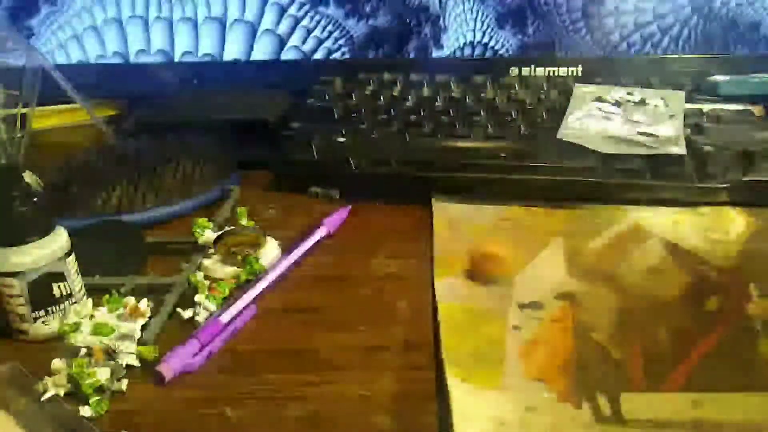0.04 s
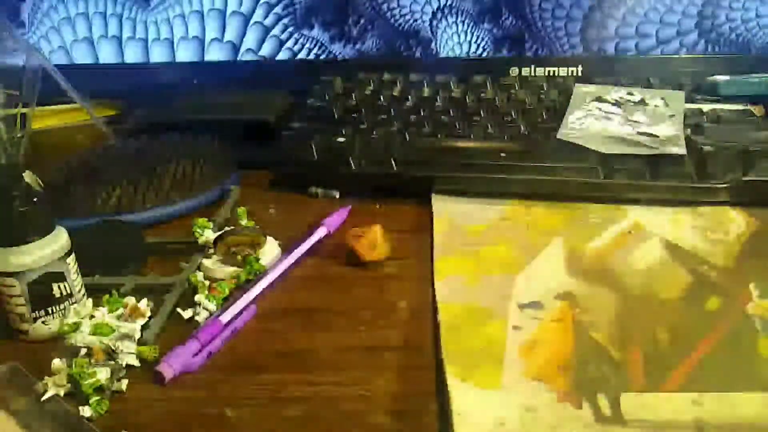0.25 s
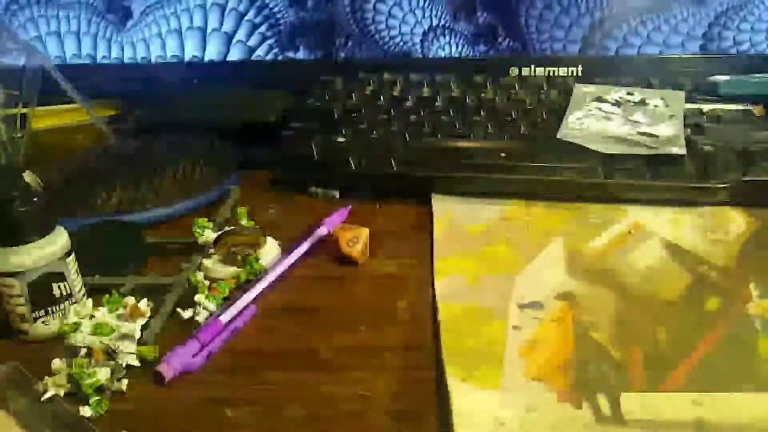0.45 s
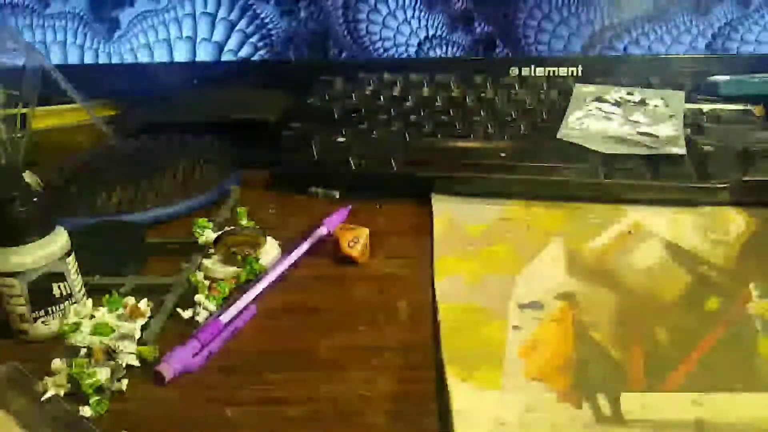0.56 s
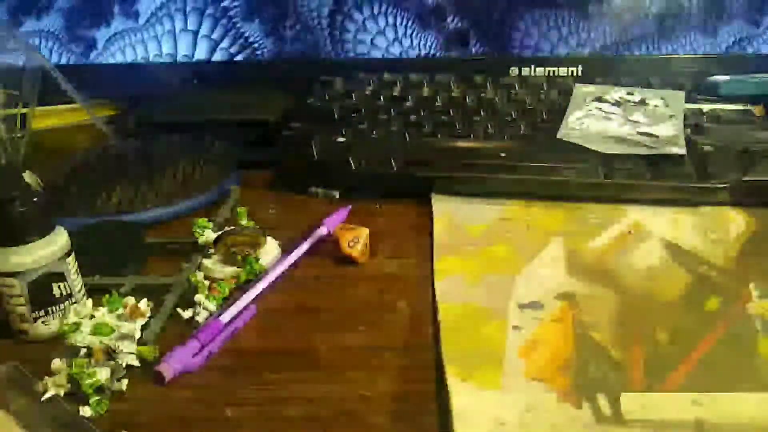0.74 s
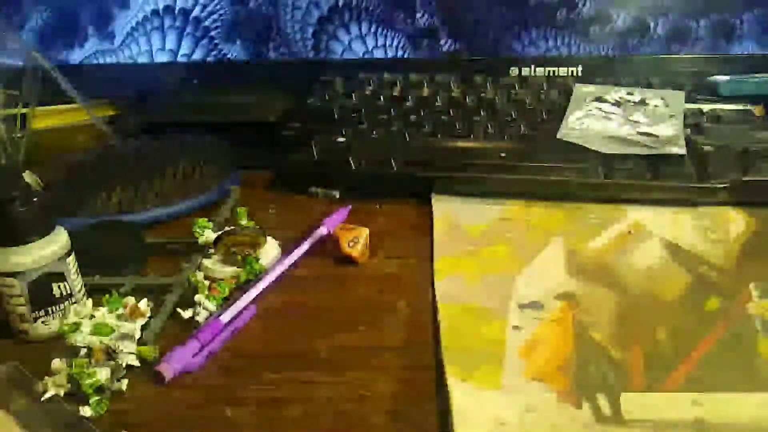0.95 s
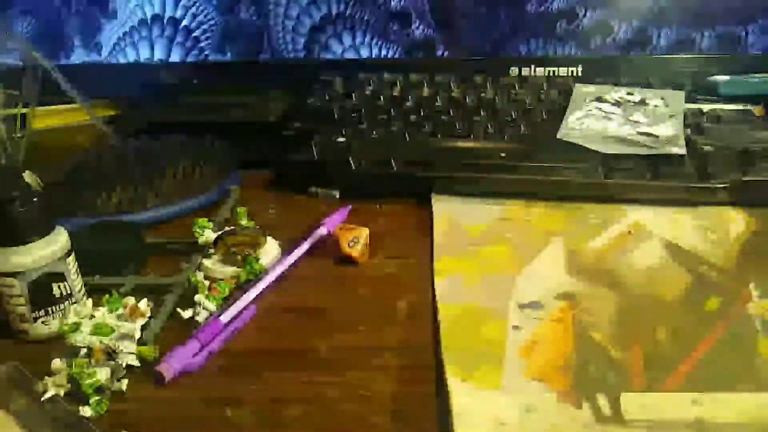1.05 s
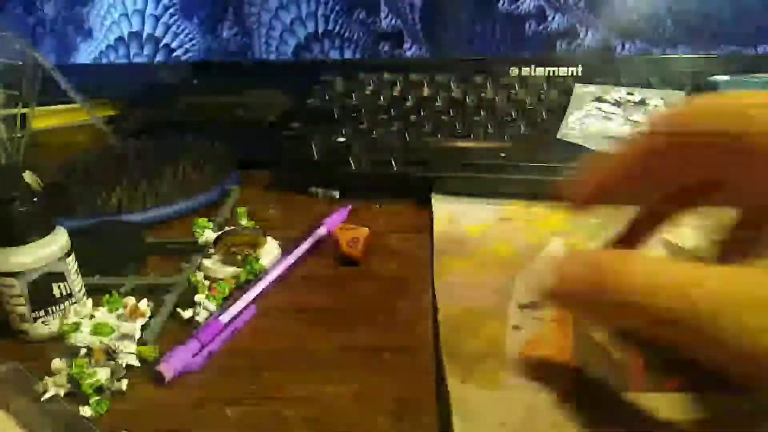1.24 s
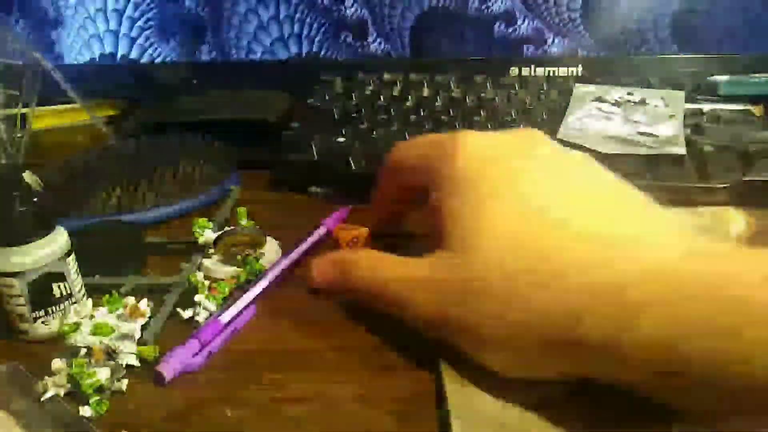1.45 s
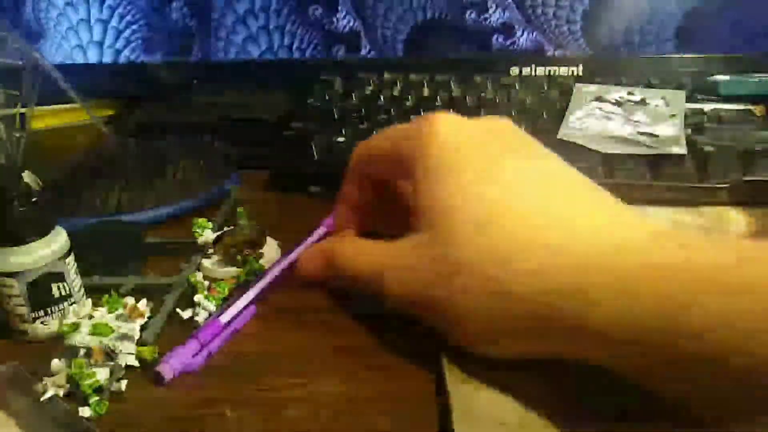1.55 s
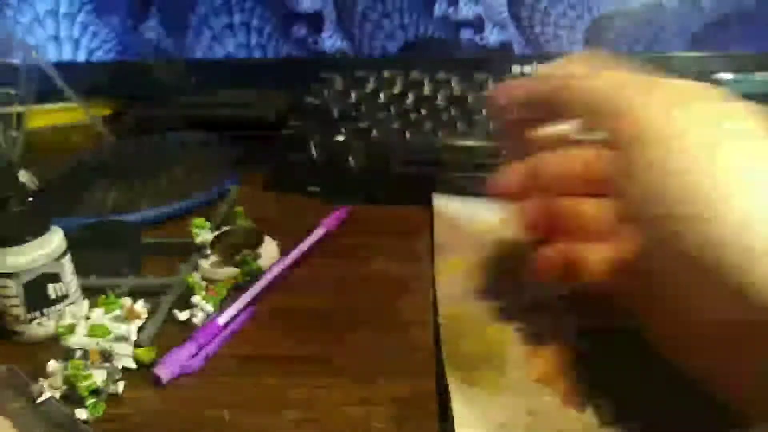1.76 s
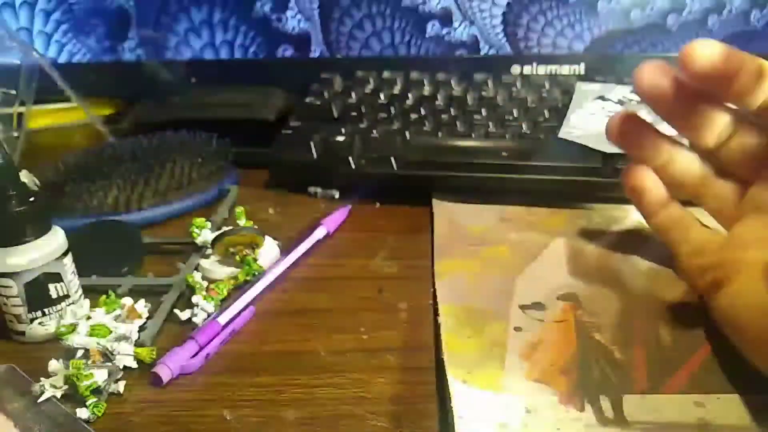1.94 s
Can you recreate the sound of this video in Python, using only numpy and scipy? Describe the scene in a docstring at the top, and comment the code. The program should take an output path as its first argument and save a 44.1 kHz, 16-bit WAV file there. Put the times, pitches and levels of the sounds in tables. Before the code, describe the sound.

A small plastic die drops on a wooden desk, bounces with sharp clicks and quickly settles. A hand then softly bumps the desk and picks the die up with a light tick. Heard close in a small room with a faint fan.

```python
"""A wooden desk in a small room, heard from close by through two microphone ports. A fan runs throughout.
At 0.2 s a plastic die drops, bounces a few times unevenly, then clatters faster and fainter to rest.
Each contact cracks, rings the desk top and scatters off the clutter into the room.
From 1.1 s a hand reaches in, bumps the desk and touches the die,
then picks it up at 1.7 s with a light scrape and a tick."""
import sys
import numpy as np
from scipy import signal
from scipy.fft import rfft, irfft
from scipy.io import wavfile

SR = 44100
rng = np.random.default_rng(int(sys.argv[2]) if len(sys.argv) > 2 else 0)


def store_wav(level_fs):
    """Save 16-bit WAV to argv[1]."""
    pcm = np.round(np.clip(np.atleast_2d(level_fs), -1, 1) * 32767)
    wavfile.write(sys.argv[1], SR, pcm.T.astype(np.int16))


N = 88200
T = np.arange(N) / SR
HZ = np.fft.rfftfreq(N, 1 / SR)

# rush of the fan (frequency [Hz], relative level [dB])
FAN_COLOUR = [(15, -75), (25, -40), (70, -5.5), (87, -8.5), (108, -2), (170, -5.5), (212, -3), (256, -4.5),
              (277, -12.5), (344, -9.5), (405, -18.5), (476, -9.5), (560, -13), (607, -10), (818, -14),
              (911, -12), (1330, -24), (1700, -24.5), (2160, -36), (2990, -30.5), (4490, -42.5),
              (14800, -47), (16000, -56)]
# hum of the fan (frequency [Hz], level [dB])
FAN_HUM = [(120, -71.5), (216, -72)]
# room tail (frequency [Hz], relative level [dB], t60 [s])
ROOM_TAIL = [(100, -13.5, 0.25), (402, -8.5, 0.27), (579.6, 2.5, 0.2), (760, -2, 0.29), (990, -1, 0.16),
             (1310, -6.5, 0.3), (1640, 3.5, .21), (2050, -7, 0.16), (2450, 2, 0.15), (3060, 0, 0.17),
             (3870, 0.5, 0.12), (4950, -5, 0.14), (8550, -6.5, 0.13), (12400, -9, 0.19), (16100, -4, .13)]
# the hand brushing past (time [s], half length [s], level [dB])
BRUSHES = [(1.158, 0.018, -73), (1.393, 0.028, -71), (1.51, 0.065, -75), (1.606, 0.048, -84),
           (1.71, 0.0088, -66.5), (1.74, .016, -72), (1.955, 0.037, -74.5)]
# fingers touching and lifting the die (time [s], level [dB])
TOUCHES = [(1.3295, -57.5), (1.3493, -55.5), (1.382, -62.5), (1.6971, -48.5)]
# low knocks of the hand on the desk (time [s], level [dB])
HAND_BUMPS = [(1.121, -59), (1.2, -54), (1.701, -52)]
# low thuds of the desk top while the die bounces (time [s], level [dB])
THUDS = [(0.207, -55), (.254, -44.5), (.341, -50.5), (0.382, -53), (.426, -53)]
# spectra of the brush, touch, scrape, tick and thud (frequency [Hz], relative level [dB])
BRUSH_COLOUR = [(200, -6), (1300, 4.5), (2200, -10), (3300, 2), (4600, -12), (7000, -15.5), (10000, -14),
                (14000, -10), (16000, -13)]
TOUCH_COLOUR = [(100, -8), (600, -8), (1000, -1), (1300, 1.5), (1700, -2.5), (2300, -10), (4000, -22.5),
                (15000, -38)]
SCRAPE_COLOUR = [(60, -3), (240, 4.5), (500, 5), (800, 2), (1250, -5), (2200, -7), (3800, -7), (7000, -25),
                 (15000, -38)]
TICK_COLOUR = [(100, 15.5), (450, -2), (800, 13), (2200, -10), (5800, -3.5), (7500, -17), (12000, -13),
               (16000, -25)]
THUD_COLOUR = [(30, -25), (70, -2), (125, 1), (250, -4), (380, -9), (700, -40), (2000, -82)]
# scatter off the keyboard and clutter (frequency [Hz], left gain [dB], right gain [dB])
SCATTER_COLOUR = [(150, -15.5, -27), (393, -9, -17), (577, 7, 3.5), (800, -3, 0.5), (1000, 11, 10),
                  (1338, -6.5, -10), (1682, 13.5, 9), (2000, -2.5, -1), (2480, -0.5, 7.5), (3110, -1, -4),
                  (3940, -4, -6), (5160, -3.5, 1.5), (8500, 2, -13), (12500, -0.5, -16.5),
                  (16000, 0.5, -20.5)]
# modes of the desk top (frequency [Hz], left gain [dB], right gain [dB], t60 [s])
DESK_MODES = [(541.6, -50, -52.5, 0.14), (604, -59.5, -50.5, 0.19), (826, -56, -54.5, 0.16),
              (975, -43.5, -44, 0.18), (1015, -53, -50.5, 0.28), (1195, -53, -52.0, 0.22),
              (1645, -28, -50.5, 0.047), (1681, -35.5, -39, 0.094), (1994, -38.5, -43, 0.091),
              (2380, -53.5, -47.0, 0.079), (2487.0, -40, -45, 0.18), (2648.0, -41.5, -49, 0.067),
              (3596, -41.5, -56.5, 0.081), (3910, -54, -54, 0.064)]
# first crack of a contact (frequency [Hz], left gain [dB], right gain [dB])
CRACK_COLOUR = [(100, -33, -38.5), (400, -30.5, -28.5), (900, -2, 5.5), (1450, -9.5, -0.5),
                (2010, -4, -15.5), (2520, 16.5, -2.5), (2910, 6.5, -9.5), (3860, 5.5, 13), (4900, 6, -1),
                (5900, -0.5, -3.5), (7110, -1.5, -2.5), (9500, -1.5, -7.5), (12500, -5.5, -5),
                (16000, -20.5, -6)]
# the die landing (time [s], strength [dB], contact time [ms], ring and scatter gain [dB], room gain [dB])
BOUNCES = [(0.2083, -6.5, 0.2, -2.5, -8), (.2530, 0, .12, -0.5, -1.5), (0.3355, -27.5, 0.15, 4.5, 17),
           (0.3394, -4.5, 0.093, 0.5, -0.5), (.3960, -11, 0.12, 1, 0.5), (0.4293, -14.5, 0.11, 2.5, 2.5),
           (0.4536, -19, 0.12, -1, 1.5), (0.4694, -24, 0.2, 3, -1), (0.493, -36, 0.17, -3, -1)]
# likeness of diffuse sound at the two ports (frequency [Hz], correlation [0-1])
PORT_LIKENESS = [(50, 0.99), (200, .88), (350, .8), (700, 0.88), (1500, .85), (3000, 0.49), (6000, .3),
                 (15000, .1)]
# phase between the ports (frequency [Hz], lead of the left [rad])
PORT_PHASE = [(20, -3), (90, -2.5), (180, -1.86), (350, -1.44), (560, -0.54), (1200, -0.27), (2200, 2),
              (4000, 0.24), (16000, 1)]

CRACK_DB, DESK_DB, ROOM_DB, FAN_DB = -0.5, 1, -2.5, -62
SCRAPE_S, SCRAPE_HALF_S, SCRAPE_DB = 1.7005, 0.011, -54.5
TICK_S, TICK_DB = 1.7008, -45.5
BUMP_HZ = 233.7
SAME_ECHO_SHARE, SAME_ECHO_ABOVE_HZ = 0.4, 3480
PORT_LAG_S, BAND_LIMIT_HZ = 0.00008, 15900


def amp(db):
    """Decibels to gain."""
    return 10 ** (np.asarray(db) / 20)


def read(table, hz=HZ, column=1):
    """One column of a table along a log-frequency axis."""
    table = np.array(table)
    return np.interp(np.log(hz + 1), np.log(table[:, 0] + 1), table[:, column])


def port_gains(table):
    """Left and right gains of a three-column table."""
    return amp([read(table), read(table, column=2)])


def lean_left(db):
    """Gains that raise the left port and lower the right by db each."""
    return amp([[db], [-db]])


def causal(gain):
    """Spectrum of the quickest causal filter with this gain."""
    fold = np.r_[1, np.full(N // 2 - 1, 2), 1, np.zeros(N // 2 - 1)]
    cepstrum = irfft(np.log(gain + 1e-6))
    return np.exp(rfft(cepstrum * fold))


def add(mix, s, sound):
    """Mixes a sound in at time s."""
    part = mix[:, round(s * SR):]
    part += sound[:, :part.shape[1]]


def noise(colour=None):
    """Noise of rms 1 at the two ports, more alike in the bass than in the treble."""
    left, other = rfft(rng.standard_normal((2, N)))
    likeness = read(PORT_LIKENESS)
    right = likeness * left + np.sqrt(1 - likeness ** 2) * other
    pair = irfft(np.array([left, right]) * (amp(read(colour)) if colour else 1))
    return pair / pair.std()


def decay(t60, t=T):
    """A fall of 60 dB every t60 seconds."""
    return np.exp(-np.log(1000) * t / t60)


def swell(rise_s, t60):
    """A quick rise and an exponential decay."""
    return (1 - np.exp(-T / rise_s)) * decay(t60)


def fan():
    """In the background, a little to the left: a steady rush of air with a faint hum."""
    hum = sum(amp(db) * np.sqrt(2) * np.sin(2 * np.pi * (hz * T + rng.random())) for hz, db in FAN_HUM)
    return (amp(FAN_DB) * noise(FAN_COLOUR) + hum) * lean_left(db=2)


def room():
    """Spectrum of the small room's diffuse tail, whose treble dies first."""
    hz, t, bands = signal.stft(noise()[:, :N // 4], SR, nperseg=256)
    t60 = read(ROOM_TAIL, hz, column=2)[:, None]
    tail = signal.istft(bands * decay(t60, t), SR, nperseg=256)[1]
    tail *= 1 - np.exp(-T[:tail.shape[1]] / 0.0022)  # the echoes build up
    return rfft(tail / np.linalg.norm(tail[0]), N) * lean_left(db=1.5)


def scatter():
    """Spectrum of the dense early echoes off the nearby clutter."""
    burst = noise() * swell(rise_s=0.0008, t60=0.036)
    return rfft(burst / np.linalg.norm(burst, axis=1, keepdims=True))


def echoes(pattern):
    """One echo spectrum per landing spot; part of the treble stays the same from spot to spot."""
    share = SAME_ECHO_SHARE * (1 - np.exp(-(HZ / SAME_ECHO_ABOVE_HZ) ** 4))
    common = pattern()
    return [np.sqrt(share) * common + np.sqrt(1 - share) * pattern() for _ in BOUNCES]


def hand():
    """Soft brushing and dull touches, then a scrape and a tick as the die's corner flicks off the wood."""
    motion = np.sqrt(sum(amp(db) ** 2 * np.exp(-((T - s) / half) ** 2) for s, half, db in BRUSHES))
    drag = amp(SCRAPE_DB) * np.exp(-((T - SCRAPE_S) / SCRAPE_HALF_S) ** 2)
    out = motion * noise(BRUSH_COLOUR) + drag * noise(SCRAPE_COLOUR)
    for s, db in TOUCHES:
        add(out, s, amp(db) * noise(TOUCH_COLOUR) * swell(rise_s=0.00061, t60=0.021))
    add(out, TICK_S, amp(TICK_DB) * noise(TICK_COLOUR) * swell(rise_s=0.00061, t60=0.015))
    return out * lean_left(db=0.6)


def desk_thuds():
    """Low, quickly damped flexing of the desk top while the die bounces and when the hand bumps it."""
    out = np.zeros((2, N))
    for s, db in THUDS:
        add(out, s, amp(db) * noise(THUD_COLOUR) * swell(rise_s=0.004, t60=0.24))
    bump = np.sin(2 * np.pi * BUMP_HZ * T)[None] * swell(rise_s=0.004, t60=0.16)
    for s, db in HAND_BUMPS:
        add(out, s, amp(db) * bump)
    return out * lean_left(db=2)


def desk_ring():
    """Spectrum of the desk top's modes ringing after one tap."""
    return rfft(sum(amp([[left], [right]]) * decay(t60) * np.sin(2 * np.pi * hz * T)
                    for hz, left, right, t60 in DESK_MODES))


def contact(ms):
    """Spectrum of a slightly lopsided half-sine push: brief and bright when a corner lands."""
    cycles = HZ * ms / 1000
    half_sine = np.pi / 4 * (np.sinc(cycles + 0.5) + np.sinc(cycles - 0.5))
    skew = 0.083 * cycles / (1 + cycles ** 3)
    return causal(np.hypot(half_sine, skew))


def die():
    """Close to the microphone, each landing is a short push that cracks, rings the desk and echoes."""
    lag = np.exp(-2j * np.pi * HZ * np.array([[0], [PORT_LAG_S]]))  # the right port hears it later
    crack = -amp(CRACK_DB) * causal(port_gains(CRACK_COLOUR)) * lag
    ring = -amp(DESK_DB) * desk_ring() * lag
    scatter_filter = causal(port_gains(SCATTER_COLOUR)) * lag
    room_filter = amp(ROOM_DB) * causal(amp(read(ROOM_TAIL)))
    first_second = T < T[-1] / 2
    out = np.zeros((2, N))
    for (s, db, ms, ring_db, room_db), early, late in zip(BOUNCES, echoes(scatter), echoes(room)):
        near = amp(ring_db) * (ring + scatter_filter * early)
        far = amp(room_db) * room_filter * late
        landing = irfft(contact(ms) * (crack + near + far))
        add(out, s, amp(db) * landing * first_second)
    return out


def scene():
    """Die, desk and hand up close, with the fan behind them."""
    return die() + desk_thuds() + hand() + fan()


def record(dry):
    """The microphone: its two ports differ in phase, most in the bass, and the top treble is cut off."""
    right = irfft(rfft(dry[1]) * np.exp(-1j * read(PORT_PHASE)))
    lowpass = signal.firwin(255, BAND_LIMIT_HZ, window=("kaiser", 8), fs=SR)
    return signal.oaconvolve(np.array([dry[0], right]), lowpass[None], "same")


dry = scene()
out = record(dry)
store_wav(out)
```